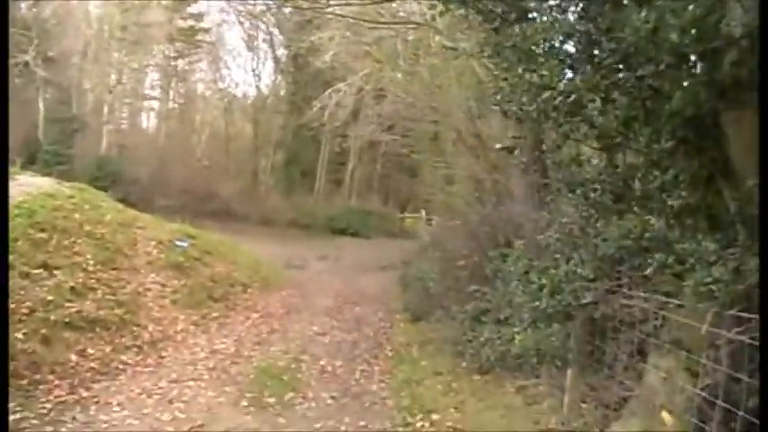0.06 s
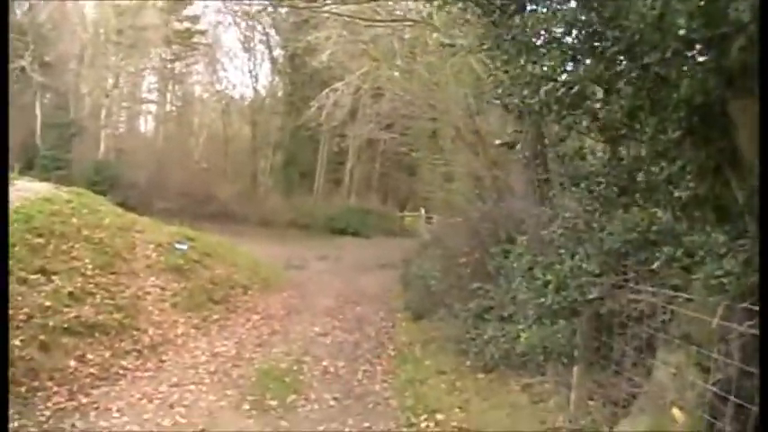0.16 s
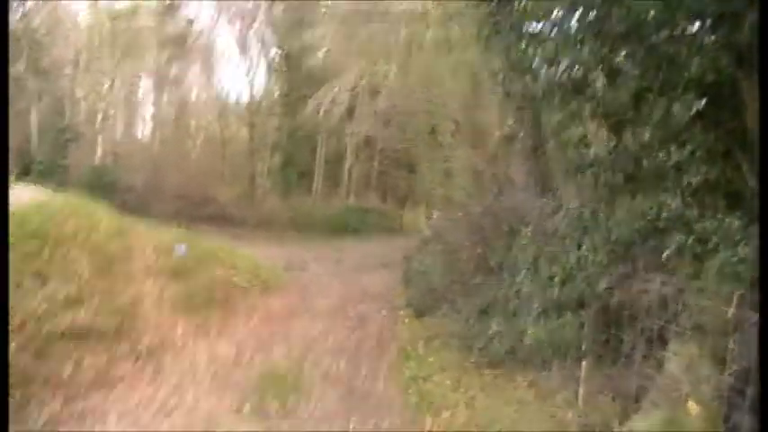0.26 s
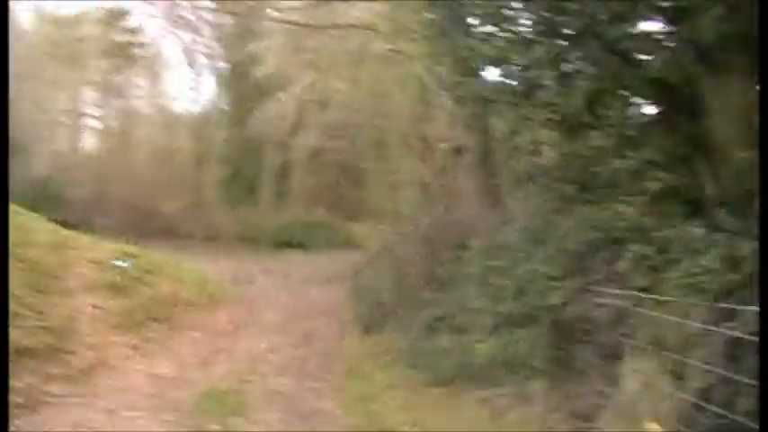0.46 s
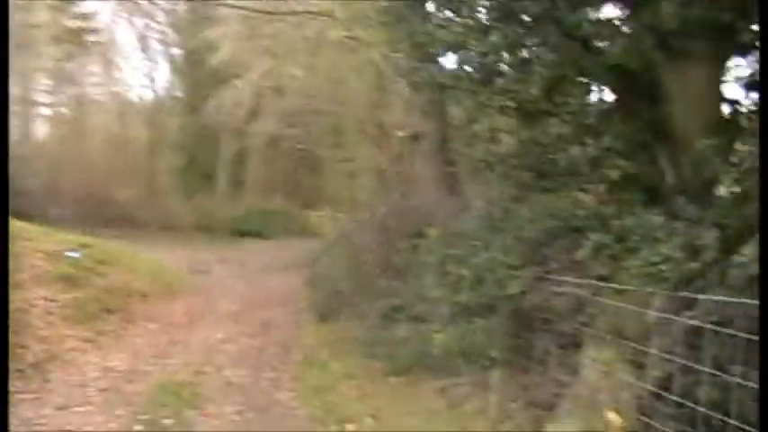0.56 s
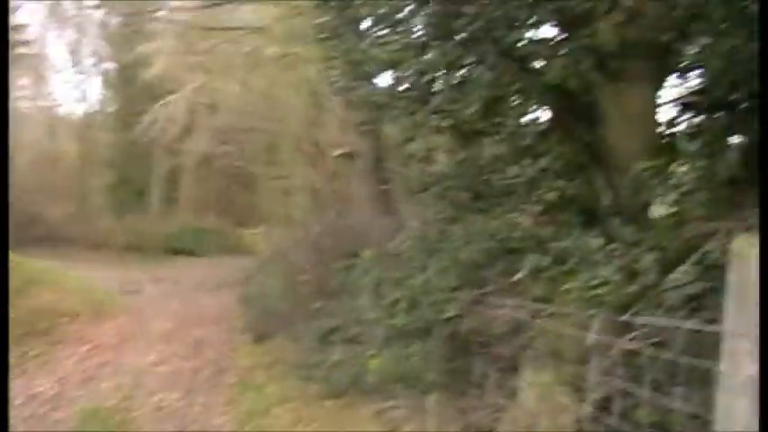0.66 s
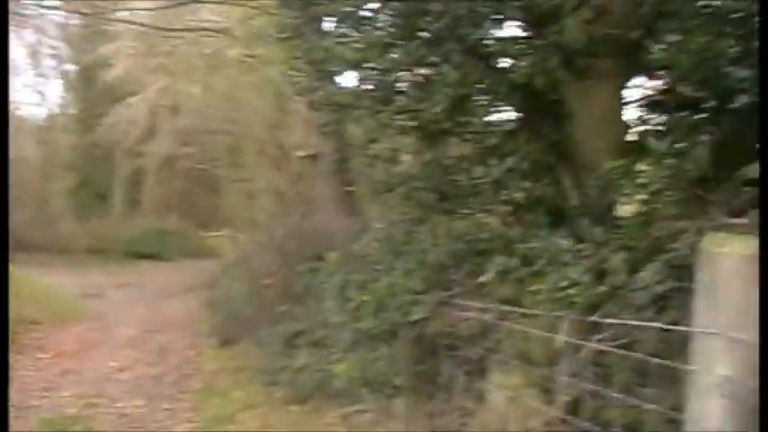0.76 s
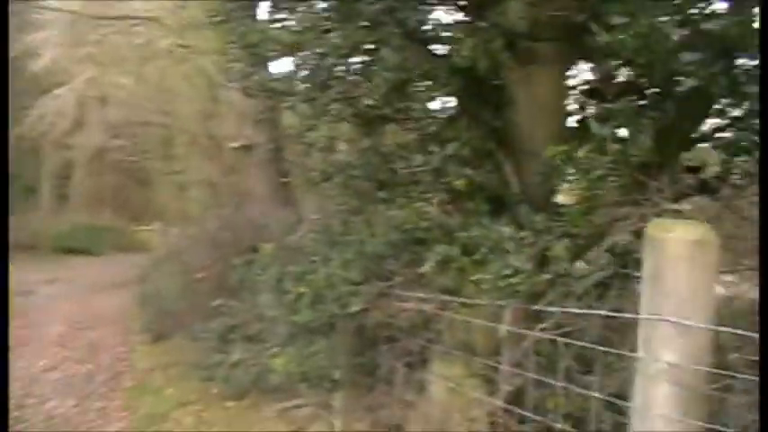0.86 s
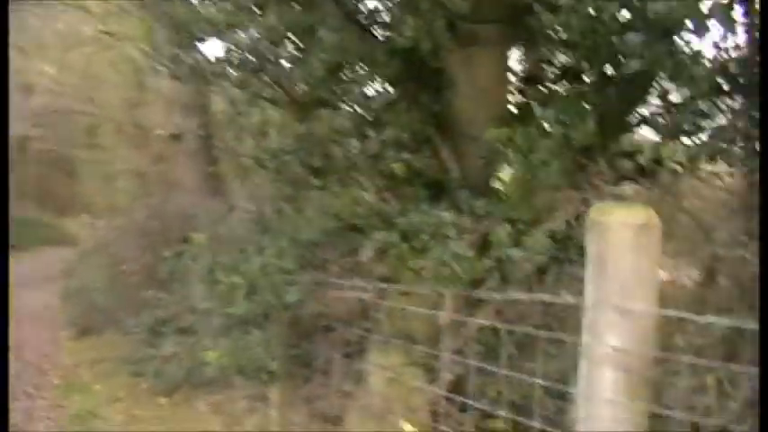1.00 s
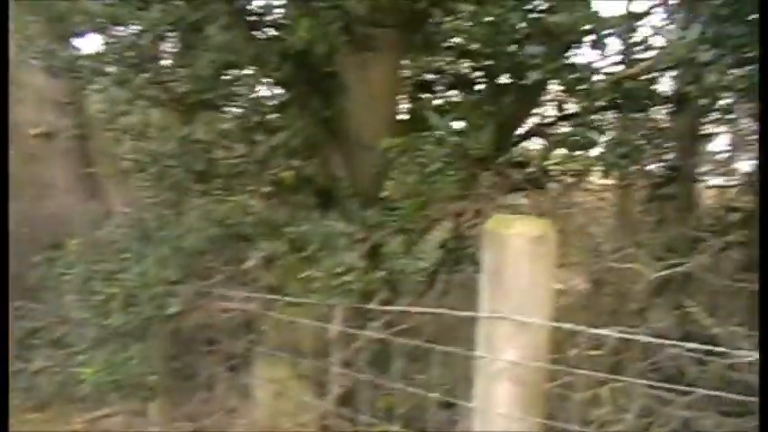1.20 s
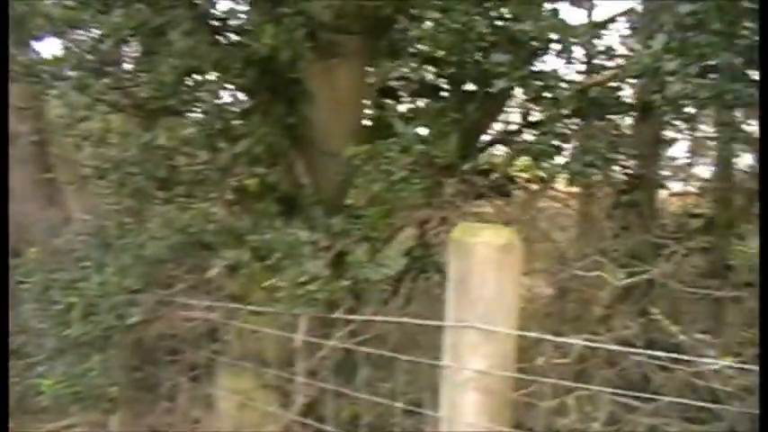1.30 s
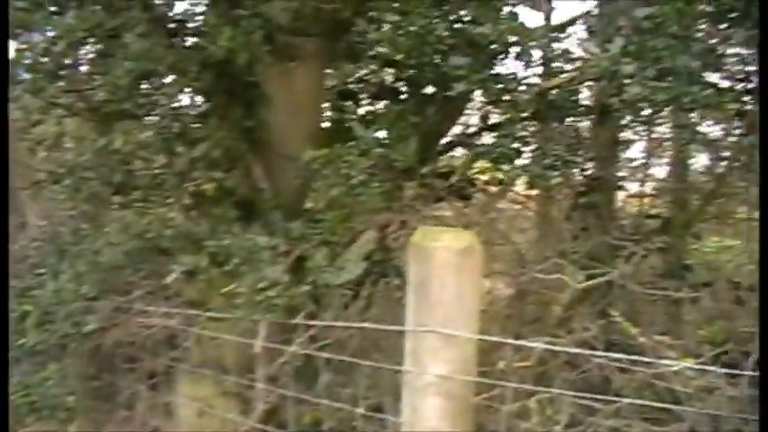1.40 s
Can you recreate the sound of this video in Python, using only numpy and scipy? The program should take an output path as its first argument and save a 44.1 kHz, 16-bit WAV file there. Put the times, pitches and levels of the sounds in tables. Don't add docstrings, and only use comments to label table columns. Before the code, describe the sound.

Heavy bird bursts from a hedge, rapid clapping wingbeats through thrashing leaves and snapping twigs

```python
import sys
import numpy as np
from scipy import signal
from scipy.fft import rfft, irfft
from scipy.io import wavfile
from scipy.ndimage import uniform_filter1d

SR = 44100
rng = np.random.default_rng(int(sys.argv[2]) if len(sys.argv) > 2 else 0)


def to_linear_factor(level_db):
    exponent = np.asarray(level_db, float) / 20
    return 10 ** exponent


def dump_mix(stems):
    frames = np.atleast_2d(stems).T
    limited = np.clip(frames, -1, 1)
    pcm = np.round(limited * 32767).astype(np.int16)
    wavfile.write(sys.argv[1], SR, pcm)


N = 63945
GRAIN = 4096
AIR_LEAD_S = 1 / 50


def on_hz(table):
    table = np.array(table, float)
    bins = np.fft.rfftfreq(N, 1 / SR)
    return np.interp(np.log(bins + 1), np.log(table[:, 0]), table[:, 1])


def colour(x, table):
    y = irfft(rfft(x) * to_linear_factor(on_hz(table)), N)
    return y / np.sqrt(np.mean(y ** 2))


def band(x, hz, width_hz):
    b, a = signal.iirpeak(hz, hz / width_hz, fs=SR)
    return signal.lfilter(b, a, signal.lfilter(b, a, x))


def add(out, s, grain):
    i = max(int(s * SR), 0)
    out[i:i + len(grain)] += grain[:N - i]


def ring(hz, t60, drop, fall_s, rough, noise):
    t = np.arange(len(noise)) / SR
    wobble = uniform_filter1d(noise, int(SR / hz) + 1) * np.sqrt(SR / hz)
    pitch = hz * (1 + drop * np.exp(-t / fall_s))
    phase = 2 * np.pi * np.cumsum(pitch) / SR
    phase = phase + rough * np.cumsum(wobble) * np.sqrt(hz) / SR * 60
    onset = 1 - np.exp(-t * hz * 2)
    return np.sin(phase) * (1 + rough * wobble) * onset * to_linear_factor(-60 * t / t60)


# multiple of the flick pitch, level in dB.
FLICK_OVERTONES = [(2.05, -16), (3.0, -14)]
FLICK_HZ, FLICK_WIDTH_HZ, FLICK_T60_S, FLICK_DB = 3212, 810, 0.043, -0.4


def flick(noise, drop, hz):
    t = np.arange(len(noise)) / SR
    hiss = band(noise, hz, FLICK_WIDTH_HZ)
    for multiple, db in FLICK_OVERTONES:
        hiss = hiss + to_linear_factor(db) * band(noise, multiple * hz, FLICK_WIDTH_HZ)
    hiss = hiss * np.sqrt(SR / FLICK_WIDTH_HZ / 4) * to_linear_factor(-60 * t / FLICK_T60_S)
    snap = ring(hz, FLICK_T60_S / 2, drop, 0.00312, 0.13, noise[::-1])
    return to_linear_factor(FLICK_DB) * (0.86 * hiss + snap)


def air_thud():
    u = np.arange(GRAIN) / SR - 0.0051 - AIR_LEAD_S
    envelope = np.exp(-.5 * (u / 0.0024) ** 2)
    return to_linear_factor(1.5) * envelope * np.cos(2 * np.pi * 153.7 * u + 1)


POP_CYCLES, POP_FALL_S = 9.9, 0.0015

# start in seconds, feather flick level in dB, air level in dB,
# pop level in dB, flick pitch in Hz.
STROKES = [(.230, -44, -37, -32, 3170), (.290, -26.5, -43, -24.5, 3500), (0.32, -42, -29, -34, 3160),
           (0.382, -25.5, -31.5, -23.5, 3350), (.455, -29, -36, -36, 3200), (.527, -40.5, -38, -21.5, 2980),
           (.601, -38, -34, -26.5, 3160), (.672, -38.5, -33.5, -29.5, 3250), (.746, -33, -39, -42, 3260),
           (0.8201, -36, -39, -52, 3200), (0.8947, -36.5, -31.5, -30, 2890), (.970, -34, -34.5, -31, 3160),
           (1.0449, -33, -35.5, -43, 3250), (1.122, -37, -40.5, -39.5, 3060),
           (1.201, -33.5, -43.5, -39, 3025), (1.289, -67, -50, -47.5, 3030)]
PUFF_HZ, PUFF_WIDTH_HZ, PUFF_LEAD_S, PUFF_S, PUFF_DB = 106, 246, .028, 0.048, -3.5
SWEEP_HZ, SWEEP_RISE, SWEEP_DB = 114.3, 0.57, -5.5
STROKE_POP_HZ, STROKE_POP_DB = 570, 1.8


def downstrokes():
    out = np.zeros(N)
    t = np.arange(GRAIN) / SR
    thud = air_thud()
    shape = np.sin(np.pi * np.clip(t / PUFF_S, 0, 1)) ** 2
    cycles = SWEEP_HZ * (t + .5 * SWEEP_RISE * t ** 2 / PUFF_S)
    sweep = to_linear_factor(SWEEP_DB) * shape * np.sin(2 * np.pi * cycles)
    for s, flick_db, air_db, pop_db, flick_hz in STROKES:
        n = rng.standard_normal((3, GRAIN))
        puff = band(n[0], PUFF_HZ, PUFF_WIDTH_HZ) * shape
        puff = puff / np.max(np.abs(puff)) + sweep
        pop = ring(STROKE_POP_HZ, POP_CYCLES / STROKE_POP_HZ, 0.29, POP_FALL_S, 0.16, n[2])
        add(out, s - PUFF_LEAD_S, to_linear_factor(air_db + PUFF_DB) * puff)
        add(out, s - AIR_LEAD_S, to_linear_factor(air_db) * thud)
        add(out, s, to_linear_factor(flick_db) * flick(n[1], 0.064, flick_hz))
        add(out, s, to_linear_factor(pop_db + STROKE_POP_DB) * pop)
    return out


# start in seconds, pop level in dB, pop pitch in Hz,
# feather flick level in dB, air thud level in dB.
CLAPS = [(0.0518, -35.5, 329.6, -58, -51), (0.2394, -17, 281, -47, -35), (0.254, -21, 193, -24, -45.5),
         (.267, -22.5, 236, -26.5, -27.5), (.331, -44, 707, -27, -28.5), (0.4018, -23, 393, -26.5, -24),
         (0.4245, -16, 262, -31, -28.5), (.473, -35.5, 262, -53, -44), (.543, -23, 570, -33, -35.5),
         (.616, -29, 576, -36, -35.5), (.624, -25.5, 416, -46, -46.5), (.689, -27, 640, -31, -41),
         (.762, -21.5, 374, -31, -33.5), (.836, -21.5, 614, -30.5, -33.5), (.9105, -26.5, 560, -36, -34),
         (.985, -17.5, 404, -28, -36), (1.0598, -22, 420, -31, -35), (1.137, -24.5, 383, -37, -37),
         (1.216, -32.5, 413, -50, -43.5)]
POP_START_HZ, POP_DROP, POP_ROUGH, POP_LAG_S = 680, 0.46, 0.1, 0.0011


def claps():
    out = np.zeros(N)
    thud = air_thud()
    for s, pop_db, pop_hz, flick_db, air_db in CLAPS:
        n = rng.standard_normal((2, GRAIN))
        drop = min(POP_DROP, POP_START_HZ / pop_hz - 1)
        pop = ring(pop_hz, POP_CYCLES / pop_hz, drop, POP_FALL_S, POP_ROUGH, n[0])
        add(out, s + POP_LAG_S, to_linear_factor(pop_db) * pop)
        add(out, s, to_linear_factor(flick_db) * flick(n[1], 0.281, FLICK_HZ))
        add(out, s - AIR_LEAD_S, to_linear_factor(air_db) * thud)
    return out


# start in seconds, level in dB, pitch in Hz,
# time to fall 60 dB in seconds.
RINGS = [(.29, -35, 664, 0.02), (.527, -27, 340, 0.033), (.5446, -27.5, 592, 0.06),
         (.559, -32.5, 400, 0.061), (.579, -35, 610, .03), (.6171, -31, 570, 0.07),
         (.6321, -32.5, 438, .06), (.665, -35, 606, 0.035), (.69, -35.5, 600, 0.092),
         (.763, -27, 593, 0.025), (.84, -31, 423, 0.039), (.986, -25.5, 627, .025),
         (1.008, -32, 563, 0.059), (1.061, -28, 592, 0.02), (1.078, -32, 463, 0.029),
         (1.155, -37, 427, .03), (1.217, -36, 600, 0.022)]


def trapped_air():
    out = np.zeros(N)
    for s, db, hz, t60 in RINGS:
        noise = rng.standard_normal(GRAIN)
        add(out, s, to_linear_factor(db) * ring(hz, t60, 0.045, POP_FALL_S, .25, noise))
    return out


# time in seconds, level in dB.
WHIRR = [(0.2, -55), (0.28, -58), (0.4, -36.5), (0.48, -42), (0.7, -43), (0.982, -46.5), (1.278, -53),
         (1.4, -52.5)]
# frequency in Hz, level in dB per Hz.
FEATHERS = [(45, -1), (120, -12), (300, -3), (600, -2.5), (1090, -14), (3420, -13), (6000, -30),
            (9000, -49)]
WHIRR_DB, WHIRR_FLICKER_DB, WHIRR_FLICKER_S = 1.7, 1.5, 0.0058
WHIRR_BEAT_DB, WHIRR_BEAT_S = 3.5, 0.039


def whirr():
    t = np.arange(N) / SR
    k = int(WHIRR_FLICKER_S * SR) + 1
    flicker = uniform_filter1d(uniform_filter1d(rng.standard_normal(N), k), k)
    db = np.interp(t, *np.array(WHIRR).T, left=-90) + WHIRR_DB
    db = db + WHIRR_FLICKER_DB * flicker / np.std(flicker)
    for row in STROKES:
        swell = np.exp(-.5 * ((t - row[0] - .01) / WHIRR_BEAT_S) ** 2 * 4)
        db = db + WHIRR_BEAT_DB * (swell - .05)
    return to_linear_factor(db) * np.array([colour(n, FEATHERS) for n in rng.standard_normal((2, N))])


# start in seconds, level in dB, attack in seconds per 24 dB,
# hold in seconds, release in seconds per 60 dB (zero or less stops at once).
THRASH = [(0.173, -60, 0.018, 0.028, -0.7), (0.218, -38, 0.0036, 0.0056, 0.4),
          (0.2436, -29, 0.004, 0.012, 0.14), (0.26, -31.5, 0.0023, 0.0088, 0),
          (0.3207, -27, 0.0012, 0.02, 0.14), (0.38, -26.5, 0.00097, 0.00094, 0.01),
          (0.4033, -32, 0.002, 0.014, 0.19), (0.461, -45, 0.0028, 0.0112, 0.37),
          (0.652, -49, 0.0043, 0.012, 0.29), (0.699, -45.5, 0.0069, 0.012, 0.26),
          (0.892, -55, .002, 0.0029, 0.75), (0.968, -54.5, .002, 0.016, 0.56),
          (1.336, -58.5, 0.005, 0.011, -0.3), (1.352, -60, .002, 0.021, -1.55),
          (1.397, -57.5, 0.001, 0.034, -0.8)]
# time in seconds, level in dB.
RUSTLE = [(0, -59.5), (.03, -65.5), (.15, -66.5), (.21, -59.5), (.3, -46), (.355, -43), (.375, -41.5),
          (.44, -40), (.49, -53.5), (.63, -49), (.74, -50), (.82, -52.5), (1.0, -58.5), (1.15, -55.5),
          (1.30, -60), (1.38, -55.5)]
# frequency in Hz, level in dB per Hz.
LEAVES = [(240, -14.5), (400, -17.5), (626, -7), (1140, -7), (1500, -8), (1850, -2), (2400, -9),
          (3520, -7.5), (8350, -8), (16000, -22.5)]
CRACKLE_PER_S, CRACKLE_SPREAD_DB, CRACKLE_SMOOTH = 5000, 3, 0.43


def leaves():
    t = np.arange(N) / SR
    gain = to_linear_factor(np.interp(t, *np.array(RUSTLE).T))
    for s, db, attack, hold, release in THRASH:
        rise_db = -24 * np.clip((s - t) / attack, 0, 9)
        fall_db = -60 * np.clip(t - s - hold, 0, 9) / max(release, .01)
        gain = gain + to_linear_factor(db + rise_db + fall_db)
    struck = rng.random((2, N)) < CRACKLE_PER_S / SR
    force = to_linear_factor(CRACKLE_SPREAD_DB * np.clip(rng.exponential(size=(2, N)), 0, 4.5))
    clicks = struck * force * np.sign(rng.standard_normal((2, N)))
    crackle = clicks / np.std(clicks) + CRACKLE_SMOOTH * rng.standard_normal((2, N))
    return gain * np.array([colour(c, LEAVES) for c in crackle])


# start in seconds, level in dB, ring pitch in
# Hz.
TICKS = [(.0031, -39.5, 3100), (.0509, -32.5, 745), (0.2305, -23, 3500), (.2448, -12, 1720),
         (.2511, -21, 2040), (0.258, -9, 6150), (.2605, -9, 8600), (0.3218, -14, 1790),
         (0.3277, -19.5, 1760), (0.3367, -10.5, 5240), (0.377, -10, 6960), (0.4029, -18, 1990),
         (0.405, -27, 7610), (0.4076, -20, 1900), (.4121, -17, 4010), (.4151, -16.5, 1900),
         (.4241, -22, 3010), (.4311, -31, 1880), (.5441, -31, 3810), (.5591, -38, 9510), (.6476, -33, 7850),
         (0.687, -29, 3860), (.8381, -37, 6510), (0.901, -28, 14000), (.9031, -27.5, 11900),
         (.9045, -35, 8100), (0.9626, -37, 2310), (0.9855, -23, 4160), (1.0597, -35, 3900),
         (1.0914, -38, 6310), (1.0925, -33, 9510), (1.099, -38, 6510), (1.1006, -33, 2200),
         (1.1211, -26, 3333), (1.1371, -35, 3330), (1.2007, -39.5, 3100), (1.2157, -32, 3000),
         (1.3446, -38, 1540), (1.346, -45, 8210), (1.3581, -25.5, 1430), (1.3586, -29, 3020),
         (1.3734, -41, 1530), (1.3971, -35.5, 8480), (1.3976, -33.5, 3610), (1.4041, -42, 3490),
         (1.4127, -36, 3010)]
TICK_CYCLES, TICK_TAIL_DB, TICK_TAIL_S, TICK_Q = 7.5, -6, 0.022, 1.5


def twigs():
    out = np.zeros(N)
    t = np.arange(2048) / SR
    for s, db, hz in TICKS:
        n = rng.standard_normal(len(t))
        tail = band(n, hz, hz / TICK_Q)
        tail = 0.41 * to_linear_factor(TICK_TAIL_DB - 60 * t / TICK_TAIL_S) * tail / np.std(tail)
        tick = ring(hz, TICK_CYCLES / hz, 0.12, 0.0008, 0.08, n[::-1])
        add(out, s, to_linear_factor(db) * (tail + tick))
    return out


WOOD_T60_S, WOOD_DB, WOOD_TOP_HZ, WOOD_GAP_S, WOOD_LOW_HZ = 0.21, -10.5, 4650, 0.0035, 400


def trunks(near):
    t = np.arange(N // 2) / SR
    tail = rng.standard_normal((2, len(t))) * to_linear_factor(-60 * t / WOOD_T60_S) * (t > WOOD_GAP_S)
    tail = signal.lfilter(*signal.butter(1, WOOD_TOP_HZ, fs=SR), tail)
    tail = tail - signal.lfilter(*signal.butter(1, WOOD_LOW_HZ, fs=SR), tail)
    tail = tail / np.sqrt(np.sum(tail[0] ** 2))
    return to_linear_factor(WOOD_DB) * signal.fftconvolve(near[None], tail, axes=-1)[:, :N]


# frequency in Hz, level in dB per Hz.
HUSH = [(18, -51), (30, -17), (64, -6.5), (130, -3), (230, -8.5), (498, -15), (1160, -19.5), (2110, -22),
        (16000, -47)]
HUSH_DB = -57


def hush():
    return to_linear_factor(HUSH_DB) * np.array([colour(n, HUSH) for n in rng.standard_normal((2, N))])


# frequency in Hz, left minus right in dB.
PORT_DB = [(60, 7.5), (200, 7), (380, 5.5), (700, 3.5), (1290, 0.56), (2380, -2), (4400, -4.5),
           (8120, -0.74), (15000, -0.46)]
# frequency in Hz, lead of the left in radians.
PORT_PHASE = [(40, 0.44), (300, -0.5), (700, -0.63), (1400, -0.7), (2200, -0.59), (3200, -0.58),
              (6200, -0.038), (15000, -1)]
# frequency in Hz, level in dB.
DIFFUSE = [(60, -13), (500, -13.5), (1200, -7.5), (2500, -8), (6000, -9.5), (9000, -14), (13000, -6)]


def ports(near, spread):
    other = rfft(spread[1]) * to_linear_factor(on_hz(DIFFUSE))
    port = to_linear_factor(on_hz(PORT_DB) / 2) * np.exp(.5j * on_hz(PORT_PHASE))
    spec = rfft(near + spread[0]) * 2 / np.abs(port + 1 / port)
    return np.array([irfft(spec * port + other, N), irfft(spec / port - other, N)])


def scene():
    near = downstrokes() + claps() + trapped_air() + twigs()
    spread = leaves() + whirr() + trunks(near) + hush()
    return ports(near, spread)


def low_pass(x):
    return signal.sosfilt(signal.butter(12, 15990, fs=SR, output="sos"), x)


LOW_CUT_HZ, TOP_HZ = 51, 15960


def record(dry):
    hz = np.fft.rfftfreq(N, 1 / SR)
    response = (hz < TOP_HZ) / np.sqrt(1 + (LOW_CUT_HZ / (hz + 1)) ** 6)
    mix = irfft(rfft(dry) * response, N)
    return low_pass(mix)


dry = scene()
out = record(dry)
dump_mix(out)
```